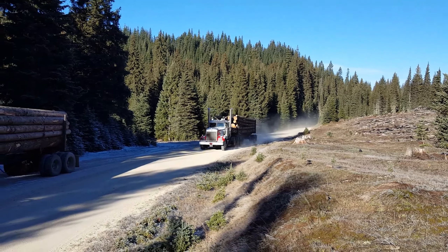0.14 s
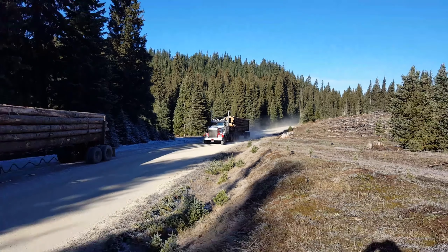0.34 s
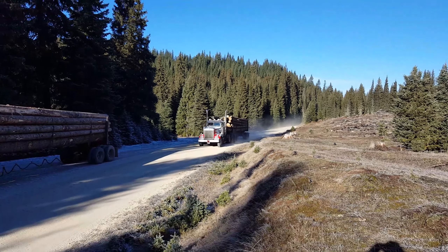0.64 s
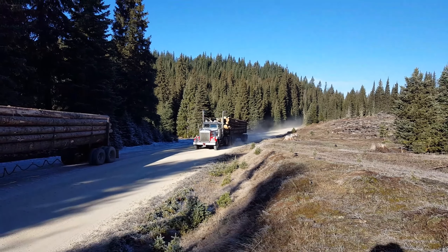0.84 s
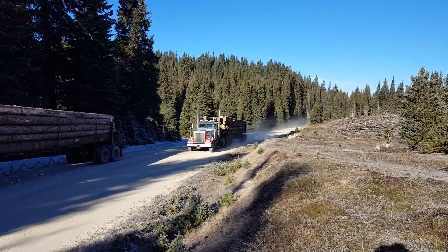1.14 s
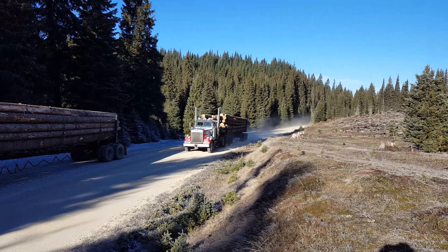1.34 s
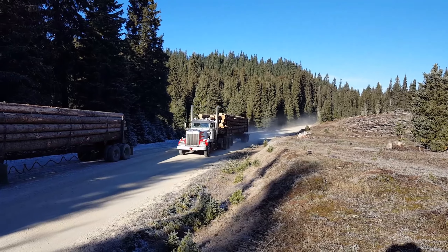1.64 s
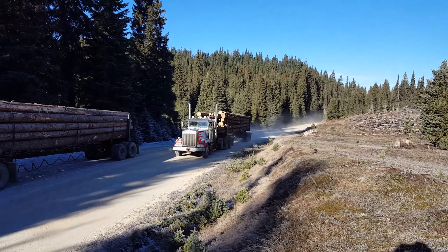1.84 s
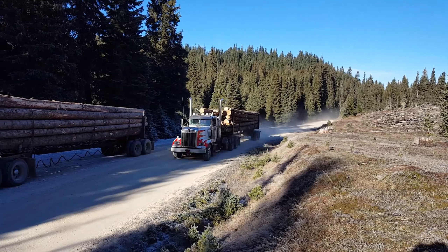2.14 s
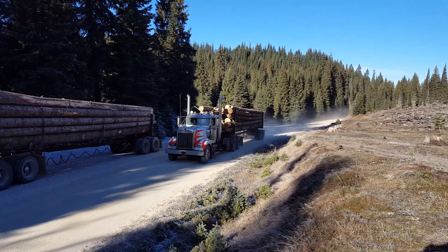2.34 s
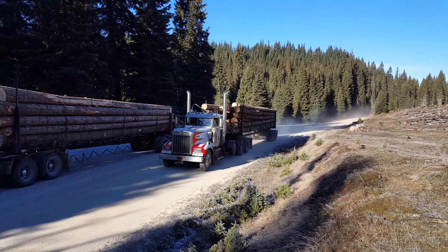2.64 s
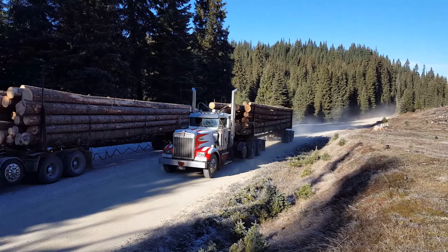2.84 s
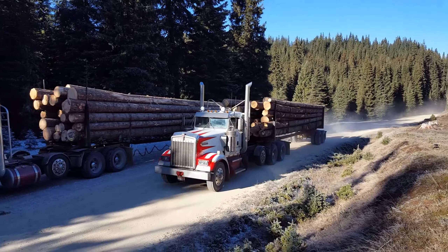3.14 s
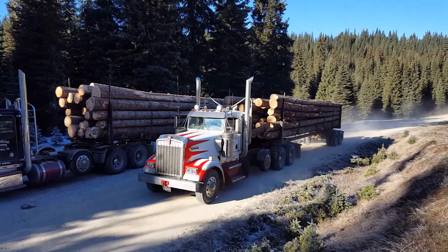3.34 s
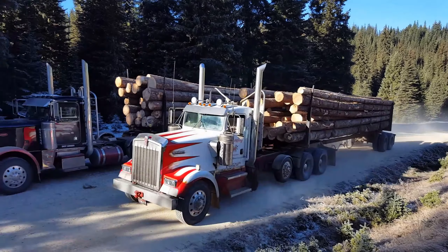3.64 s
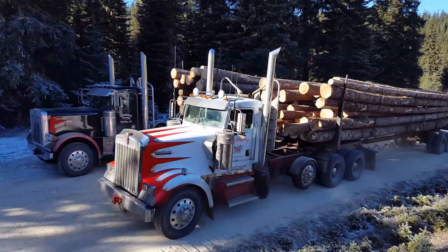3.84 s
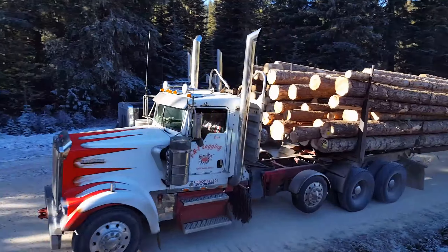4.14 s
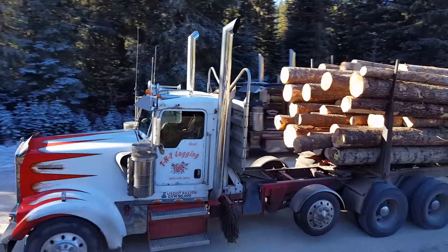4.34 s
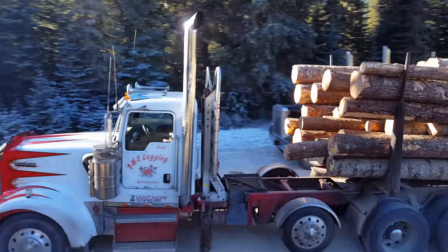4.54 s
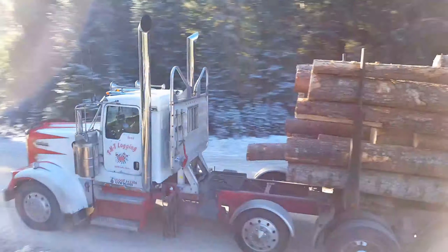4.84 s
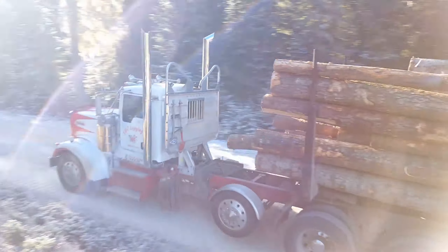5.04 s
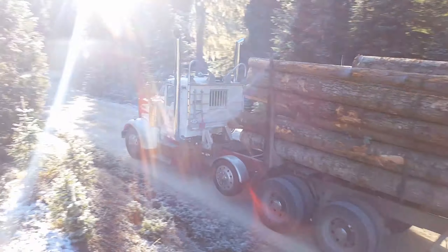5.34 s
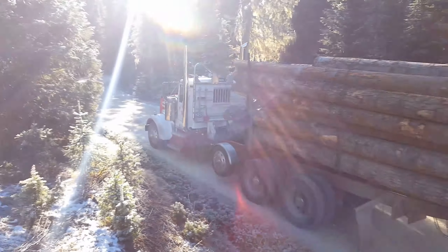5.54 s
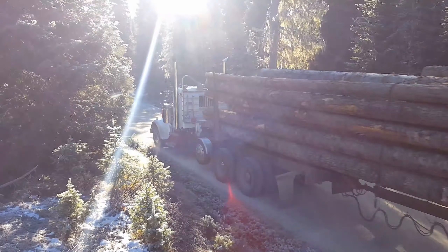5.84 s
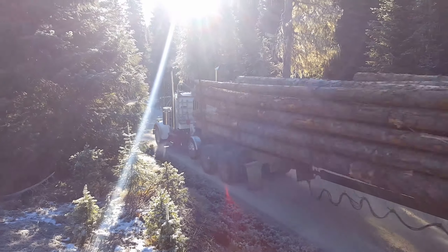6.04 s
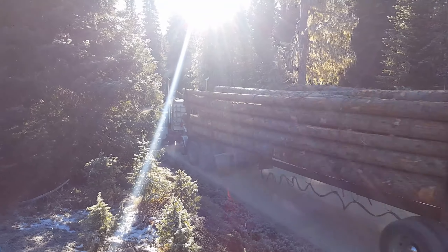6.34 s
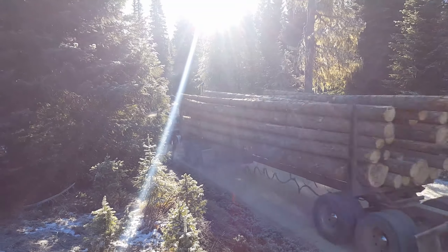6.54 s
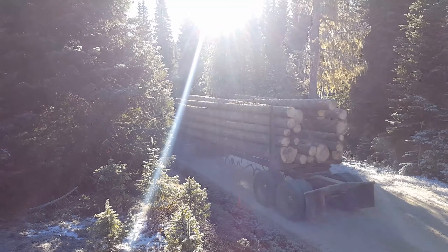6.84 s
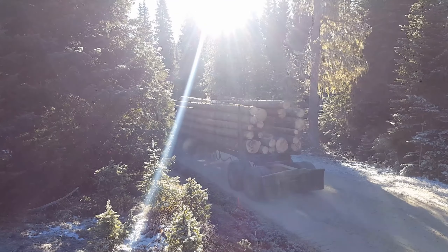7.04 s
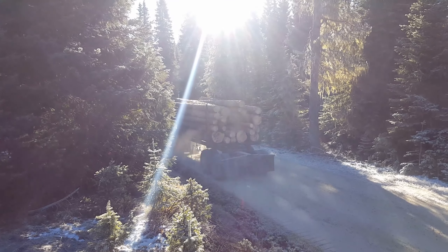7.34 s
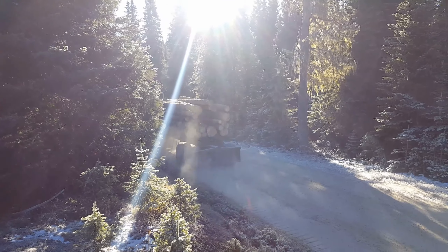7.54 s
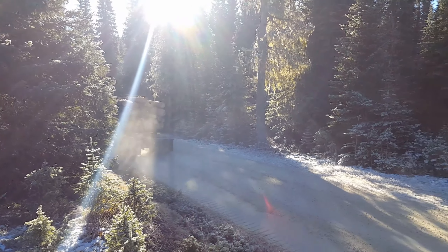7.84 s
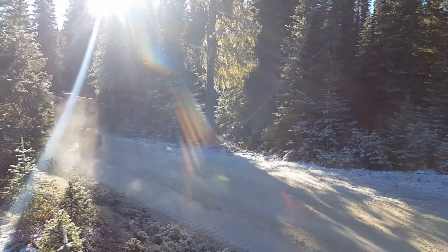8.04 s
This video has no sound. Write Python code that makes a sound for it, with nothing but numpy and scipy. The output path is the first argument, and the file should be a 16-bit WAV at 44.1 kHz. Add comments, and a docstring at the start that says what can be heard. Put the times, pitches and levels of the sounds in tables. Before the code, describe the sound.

A loaded diesel truck drones closer on a gravel forest road, passes with whistle, rattling panels and clanking steel, then fades away.

```python
"""Diesel truck on a gravel forest road

A loaded six-cylinder truck climbs, passes close by and drives off. The exhaust is a harmonic series on
the firing rate, combed by a ground echo; uneven cylinders add lines between. Gated noise makes the block
clatter, wavering sines the turbocharger whistle, random bursts the tyres on gravel; driven resonances make
panels rattle, decaying sines dull knocks, chains and hooks, and swelling harmonics a log bunk's squeak."""
import sys
import numpy as np
from scipy import signal
from scipy.fft import rfft, irfft, next_fast_len
from scipy.io import wavfile
from scipy.ndimage import uniform_filter1d

SR = 44100
rng = np.random.default_rng(int(sys.argv[2]) if len(sys.argv) > 2 else 0)


def output_pcm(signal):
    """Save a mono or channel-first signal as 16-bit PCM at the path in sys.argv[1].

    Samples are clipped to [-1, 1] before scaling.
    """
    pcm = np.clip(np.atleast_2d(signal).T, -1, 1) * 32767
    wavfile.write(sys.argv[1], SR, np.round(pcm).astype(np.int16))


N = 361175


def ground_echo(multiple, hz, delay):
    """Interference: the direct sound and its delayed ground echo add or cancel with their phase difference."""
    return 1 + 0.59 * np.exp(-2j * np.pi * multiple * hz * delay)


def harmonic_levels(first_db, overtone_db, bright_db, echo):
    """Spectral envelope: overtones follow a slope per octave, the ground echo and slow changes of level."""
    # Relative levels of harmonics 2 to 6 in dB.
    relative_db = [1.5, 0, -4.5, -13.5, -25]
    # Levels of the upper exhaust harmonics rise and fall. Each row: time in seconds, seventh harmonic in dB
    # before a fixed cut, then lifts of the fourth, fifth and sixth in dB.
    upper_harmonics = [(0, -53, 1.5, 1, -1), (.5, -51, 0, -2.5, 5), (1, -49, 4, 2, -2),
                       (1.5, -44, 2.5, 0.5, -2), (1.9, -41.5, -1.5, 0.5, 2), (2.3, -41.5, 4, 5, -2),
                       (2.6, -38.5, -2, 3.5, 2), (2.9, -37, -2, 0.5, -1), (3.2, -41.5, -1.5, -3, -5),
                       (3.5, -36.5, 0, 1, -3), (3.8, -33.5, 1.5, 0.5, -10), (4.1, -43, -8, -2.5, -2),
                       (4.4, -47, 1.5, -1.5, 5), (4.7, -49, 1.5, 3, -6), (5, -37.5, -2.5, -2, -3),
                       (5.3, -38, 1.5, 4.5, 9), (5.6, -44, 1, -2.5, 1), (5.9, -54, -4, 3, 3.5),
                       (6.2, -45, 3.5, 1, 4.5), (6.5, -42, 3, -1.5, -4.5), (6.8, -53, -10, 0, 3),
                       (7.1, -49, -13, -3.5, -5), (7.4, -60, 6, -5, -1), (7.8, -59, 0.5, 2, 2),
                       (8.19, -53, -11, -5, 1)]
    levels_db = [first_db]
    for k, db in enumerate(relative_db, 2):
        slope_db = bright_db * np.log2(k / 2)
        levels_db.append(overtone_db + db + slope_db + 20 * np.log10(np.abs(echo(k))))
    seventh_db, *lifts_db = in_time(upper_harmonics)
    lifted_db = [db + lift_db for db, lift_db in zip(levels_db[3:], lifts_db)]
    return levels_db[:3] + lifted_db + [seventh_db - 3.5]


def exhaust(firing, hz, levels_db, echo, waver_db, lean):
    """Fourier synthesis: firing harmonics with turbulent puffs, and phase-locked lines of uneven cylinders."""
    # Trees and load slowly turn each overtone's phase. Each row: time in seconds, rms turn in radians.
    scatter_rows = [(0, .12), (2.4, .2), (3.2, .5), (4.8, .5), (5.2, .15), (6.2, .2), (8.19, .4)]
    # How much the uneven lines stand out. Each row: time in seconds, level in dB.
    unevenness = [(0, -4), (1.6, -4), (2.4, -.5), (3.2, -1), (3.5, -4), (4.3, -4), (4.7, 0), (5.3, -5),
                  (5.7, -10), (6.2, -10), (7, -6), (8.19, -4)]
    # The pulses grow compact as the truck draws near and stay so. Each row: time in seconds, share of the
    # stacks' phase turn.
    through_stacks = [(0, 1), (2.9, 1), (3.4, .4), (4.3, .4), (4.9, 0), (8.19, 0)]
    # The drone breaks up behind load and trees. Each row: time in seconds, level in dB of each quadrature
    # of the turbulent puffs relative to the harmonics.
    puffs = [(0, -31), (4, -30), (6.2, -31), (6.8, -25), (7.3, -14), (8.19, -11.5)]
    # Mean phase in radians of each family of uneven lines, by sixths modulo six.
    pattern_rad = [0, 2.1, 0, 1.5, 0, -2.1]
    # Each row: frequency in sixths of the firing rate, offset in dB from the harmonics around.
    uneven = [(3, -50), (8, -13), (9, -7), (13, -40), (14, -14.5), (15, -9), (16, -59.5), (19, -11.5),
              (20, -8.5), (21, -11.5), (22, -11.5), (23, -19.5), (25, -27), (26, -28), (27, -11.5),
              (28, -11.5), (31, -13), (32, -3), (33, -8.5), (34, -8.5), (38, -12)]
    stack_hz, stack_width_hz = (245, 385), 15
    spread, = in_time(scatter_rows)
    scatter = [0, 0] + [spread * drift(.25) for _ in range(7)]
    stand_db, = in_time(unevenness)
    through, = in_time(through_stacks)
    puff_db, = in_time(puffs)

    def phase(multiple):
        """Linear filtering: each resonance turns the phase above it by half a cycle; the echo turns it too."""
        turn = 0
        for pipe_hz in stack_hz:
            turn = turn + np.arctan((multiple * hz.mean() - pipe_hz) / stack_width_hz) + np.pi / 2
        source = multiple * (firing + lean)
        return source - through * turn + scatter[round(multiple)] + np.angle(echo(multiple))

    out = 0
    for k, level_db in enumerate(levels_db, 1):
        # The fundamental is puffed at a quarter of the amplitude.
        puff = from_db(puff_db) * min(k / 2, 1) ** 2 * (drift(12) + 1j * drift(12))
        out = out + from_db(level_db) * np.imag((1 + puff) * np.exp(1j * phase(k)))
    pattern = [rad + .25 * drift(1) for rad in pattern_rad]
    for sixths, under_db in uneven:
        # The level is interpolated between the neighbouring harmonics.
        place = np.clip(sixths / 6 - 1, 0, 5)
        low = min(int(place), 4)
        around_db = levels_db[low] + (place - low) * (levels_db[low + 1] - levels_db[low])
        line = np.sin(phase(sixths / 6) + pattern[sixths % 6])
        out = out + from_db(around_db + under_db + stand_db + waver_db * drift(1.3)) * line
    return np.sqrt(2) * out


def block_clatter(firing, level_db):
    """Amplitude modulation: combustion gates noise whose spectrum shifts from the front to the side view."""
    # From afar, ahead of the truck. Each row: frequency in hertz, relative density in dB per hertz.
    ahead_spectrum = [(410, -31.5), (700, -6), (774, -2), (877, -1.5), (942, -1.5), (1090, -1), (1170, -1),
                      (1270, -2.5), (1580, -13.5), (2030, 2), (2250, -9.5), (2900, -20.5), (3770, -50.5),
                      (6380, -120)]
    # Alongside it. Each row: frequency in hertz, relative density in dB per hertz.
    beside_spectrum = [(440, -37.5), (750, -8.5), (874, -16), (919, -5), (1130, 1.5), (1230, -2), (1390, 2),
                       (1610, -6), (2250, -4), (2900, -13.5), (3770, -43.5), (6380, -120)]
    # Each row: time in seconds, power share heard from the side.
    alongside = [(0, 0.0074), (2, 0.072), (3.4, 0.5), (4.2, 0.8), (6.8, 0.51), (8.19, 0.35)]
    side, = in_time(alongside)
    knocking = firing_gate(firing, depth=0.35) * from_db(1.0 * drift(17))
    ahead = np.sqrt(1 - side) * coloured(ahead_spectrum, knocking)
    beside = np.sqrt(side) * coloured(beside_spectrum, knocking)
    return from_db(level_db) * (ahead + beside)


def rattle(firing):
    """Forced resonance: each firing thumps the pipe and shakes the panels, one cylinder harder than the rest."""
    # Each row: time in seconds, pipe rasp in dB, panel rattle in dB.
    rattle_rows = [(0, -56.5, -64.5), (3.9, -46.5, -63.5), (4.3, -37, -50), (4.55, -32, -38),
                   (4.7, -34.5, -37.5), (4.9, -38.5, -42), (5.1, -40, -42), (5.55, -40, -61),
                   (5.7, -31.5, -53), (5.95, -35.5, -55), (6.2, -38.5, -61), (6.33, -35, -43),
                   (6.52, -31, -46), (6.62, -44, -45), (6.9, -53, -44), (7.5, -44, -59), (8.19, -48.5, -64)]
    # Pipe resonances. Each row: frequency in hertz, width in hertz, gain in dB.
    pipe_modes = [(610, 110, -3), (730, 130, 0), (830, 90, -5)]
    # Panel resonances. Each row: frequency in hertz, width in hertz, gain in dB.
    panel_modes = [(2940, 130, -15), (3830, 96, -2.5), (4500, 200, 3.5), (5100, 330, -2.5),
                   (5500, 300, -3.5)]
    # Mean force in dB of each cylinder of the cycle.
    cylinders_db = [4.5, -1, 1.5, -1.5, 0, -3.5]
    rasp_db, rattle_db = in_time(rattle_rows)
    turn = firing / (2 * np.pi)
    count = np.floor(turn).astype(int)
    chance_db = 1.9 * rng.standard_normal(np.ptp(count) + 1)
    force_db = np.array(cylinders_db)[count % 6] + chance_db[count]
    # Each burst decays by 13 dB until the next firing.
    noise = rng.standard_normal((4, N)) * from_db(force_db - 13 * (turn - count))
    thumps = np.diff(count, prepend=count[0]) * from_db(.5 * force_db)
    rasp = from_db(rasp_db) * resonances(thumps + 0.1 * noise[3], pipe_modes)
    shared_and_own = noise[0] + 0.48 * noise[1:3]
    return rasp + from_db(rattle_db) * resonances(shared_and_own, panel_modes)


def turbo(firing):
    """Frequency modulation: a thin wavering whistle with a smear 2.5 % lower, and firing-gated intake hiss."""
    # Each row: time in seconds, whistle in hertz before smoothing, whistle in dB before its spin-down fade,
    # intake hiss in dB, left-right difference of the whistle in dB.
    turbo_rows = [(0, 6300, -67, -53, -11), (.45, 6250, -57.5, -53.5, -4), (1, 6006, -64.5, -51, -10),
                  (1.5, 6220, -60, -48.5, -14), (1.9, 6520, -47.5, -44.5, -7),
                  (2.8, 7110, -47, -28.5, -6.5), (3.3, 7410, -41, -24, 2), (3.7, 7720, -42, -32, 6.5),
                  (4.4, 8060, -49, -33, 7.5), (5.2, 8240, -55, -35.5, 5.5), (6, 8150, -62, -36.5, 8),
                  (6.4, 8060, -60, -33, 11.5), (6.9, 7520, -47.5, -42, 2), (7.2, 7014, -51, -37, -1),
                  (7.4, 6675, -67, -38, -18.5), (7.5, 6440, -62, -37, -17), (7.57, 6300, -51.5, -37, -15),
                  (7.68, 6090, -56, -38, -15), (7.8, 5910, -66, -41, -19), (8.19, 5517, -73, -48, -18)]
    # Each row: time in seconds, smear over the whistle in dB, share of hiss not dulled by air.
    turbo_air = [(0, 3, 0.0098), (2, -1, 0.05), (3.4, 2.5, 0.53), (4.2, 4.5, 0.73), (7.1, 0, 0.78),
                 (7.45, -12, 0.54), (8.19, -14, 0.66)]
    # Intake hiss. Each row: frequency in hertz, relative density in dB per hertz.
    intake = [(3240, -34), (5500, -18.5), (6060, 1.5), (6840, 5.5), (7240, 2.5), (8420, -16), (10900, -58),
              (18500, -120)]
    hz, whistle_db, hiss_db, side_db = in_time(turbo_rows)
    smear_db, clear = in_time(turbo_air)
    # The whistle dies as the rotor spins down.
    whistle_db = whistle_db - np.clip((5980 - hz) / 8, 0, 40)
    phase = 2 * np.pi * np.cumsum(inertia(hz) * (1 + 0.001 * drift(25))) / SR
    gain = np.sqrt(2) * from_db(whistle_db + 4.1 * drift(41))
    whistle = gain * np.array([np.sin(phase), np.sin(phase + 0.23 + 0.39 * drift(1.3))])
    below = np.exp(1j * phase * .975)
    smear = np.array([np.imag(below * (drift(150) + 1j * drift(150))) for _ in "LR"])
    smear = smear * from_db(whistle_db + smear_db)
    breath = firing_gate(firing, depth=2.2) * from_db(1.4 * drift(21))
    hiss = from_db(hiss_db) * coloured(intake, breath)
    # Air dulls the far hiss.
    dull = signal.sosfilt(signal.butter(4, 7000, fs=SR, output="sos"), hiss)
    hiss = clear * hiss + (1 - clear) * dull
    return pan(whistle + smear, side_db) + pan(hiss, 0.29 * side_db)


def tyre_hiss(firing, tyre_db):
    """Superposed impacts: gravel bursts and the firing modulate coloured noise."""
    # Each row: frequency in hertz, relative density in dB per hertz.
    hiss_spectrum = [(1410, -40), (2400, 2.5), (2790, -9), (3070, 3), (3300, -1.5), (3620, 2.5), (4110, -5),
                     (4480, -8.5), (5090, -7), (6000, -7), (7800, -46), (13200, -120)]
    return from_db(tyre_db) * coloured(hiss_spectrum, gravel(150, 1.8) * firing_gate(firing, depth=2.5))


def roar(tyre_db):
    """Superposed impacts: low noise under a gravel envelope follows the swing of the tyre noise."""
    # Each row: frequency in hertz, relative density in dB per hertz.
    roar_spectrum = [(250, 2), (400, 6), (520, -3.5), (700, -3.5), (850, -3.5), (1200, -29)]
    level_db = -42 + tyre_db - tyre_db.mean()
    return from_db(level_db) * coloured(roar_spectrum, gravel(80, 4.5), band=(480, 780))


def rumble(rumble_db, delay):
    """Comb filtering: low road noise is joined by its bounce off the road."""
    # Each row: frequency in hertz, relative density in dB per hertz.
    rumble_spectrum = [(15, -32), (25, -10), (40, -9), (55, -2.5), (90, -3), (140, 4), (220, 5), (310, -1),
                       (420, -14), (600, -57)]
    return from_db(rumble_db) * with_echo(coloured(rumble_spectrum, 1, band=(20, 55)), delay, .7)


def grit():
    """Impulse excitation: single stones snap sharply, each stronger on its own side."""
    # Each row: time in seconds, level in dB.
    grit_rows = [(0, -66), (3.8, -54), (4.4, -46), (4.7, -43), (5.1, -47), (5.8, -49), (6.2, -46),
                 (7.1, -46), (7.5, -55), (8.19, -64)]
    snaps_per_s = 190  # both sides together
    struck = rng.random((2, N)) < snaps_per_s / 2 / SR
    strength = from_db(5.4 * np.minimum(rng.exponential(1, (2, N)), 4))
    snaps = struck * strength * rng.choice([-1, 1], (2, N))
    snaps = snaps + .6 * snaps[::-1]
    band = signal.butter(2, [1000, 3900], "band", fs=SR, output="sos")
    return from_db(in_time(grit_rows)[0]) * rms_one(signal.sosfilt(band, snaps + 1e-18))


def squeak():
    """Stick-slip of steel on steel: a log bunk's harmonic cries swell, waver, sag in pitch and fade."""
    # Each row: start in seconds, length in seconds, starting pitch in hertz, sag in hertz per second,
    # levels of harmonics 1 to 4 in dB before swell and flicker.
    squeaks = [(5.053, .085, 880, 240, -33, -30, -38, -45), (5.122, .086, 888, 450, -25, -32, -38, -46),
               (5.203, .088, 776, 100, -27.5, -40, -34, -54)]
    out = np.zeros(N)
    waver_hz = 5 * drift(18)
    waver = np.cumsum(waver_hz) / SR
    flicker = [from_db((1.8 + .6 * k) * drift(40)) for k in range(4)]
    for start, length, hz, sag, *levels_db in squeaks:
        age = np.arange(round(length * SR)) / SR
        first = round(start * SR)
        span = slice(first, first + len(age))
        phase = 2 * np.pi * (hz * age - sag * age ** 2 / 2 + waver[span])
        swell = np.abs(np.sin(np.pi * (age / length) ** 1.3))
        cry = 0
        for k, level_db in enumerate(levels_db, 1):
            # Higher harmonics build up later and fade sooner.
            gain = from_db(level_db) * flicker[k - 1][span] * swell ** (.35 * k)
            cry = cry + gain * np.sin(k * phase)
        out[span] += np.sqrt(2) * cry
    return out


def chains():
    """Free vibration: struck chain links ring briefly."""
    # Each row: start in seconds, initial level in dB before the rise, ring in hertz, 60 dB decay in seconds.
    clinks = [(5.279, -32, 6970, .04), (5.552, -24.5, 6310, 0.093), (5.61, -28, 6970, 0.072)]
    return sum(ring(s, db, hz, t60, rise=0.00051) for s, db, hz, t60 in clinks)


def hooks():
    """Modal superposition: loose stakes and hooks tick on two close modes with a dry crack."""
    # Each row: start in seconds, initial level of the main mode in dB before the rise, its ring in hertz.
    ticks = [(4.4468, -34, 3650), (4.4638, -35, 3550), (4.5536, -32, 3870), (4.578, -31, 3690),
             (4.645, -18, 3860), (4.6748, -19, 4500), (4.7038, -33, 4640), (4.7362, -24, 3720),
             (4.7641, -28, 4460), (4.796, -18, 4370), (4.827, -30, 4380), (4.844, -23, 4500),
             (4.8583, -19, 4330), (4.875, -23, 4780), (4.9497, -36, 4450), (4.9816, -22, 3730),
             (5.0123, -31, 3800), (5.0907, -26, 3400), (5.1378, -23, 3400), (5.3882, -37, 3600),
             (5.681, -28, 3770), (5.7574, -29, 3560), (5.8636, -24, 3722), (6.1824, -33, 3622),
             (6.3035, -23, 3750), (6.3306, -42, 3470), (6.3491, -26, 3700), (6.4054, -24, 3680),
             (6.4513, -22, 3607), (6.498, -23, 3577), (6.5567, -31, 3560), (6.8229, -33, 3554),
             (6.8404, -29, 3640), (6.9131, -32, 3700), (6.9282, -23, 3494), (6.9601, -25, 3700),
             (7, -32, 3400), (7.0459, -24, 3370), (7.092, -31, 3400), (7.165, -31, 3500),
             (7.314, -37, 3600)]
    t60_s, crack_db = .022, -9
    out = 0
    for s, db, hz in ticks:
        out = out + ring(s, db, hz, t60_s, rise=0.00061)
        out = out + ring(s, db - 10.5, hz * 1.13, t60_s, rise=0.0004)
        out = out + ring(s, db + crack_db, hz * .6, .005, rise=.0001)
        out = out + ring(s, db + crack_db, hz * .8, .004, rise=.0001)
    return out


def dull_knocks():
    """Modal superposition: dull, quickly damped knocks of four modes, the early ones once per engine cycle."""
    # Each row: start in seconds, reference level in dB, reference ring in hertz.
    knocks = [(4.461, -25, 748), (4.553, -21.5, 790), (4.645, -13.5, 598), (4.732, -19, 672),
              (4.824, -19.5, 673), (6.9705, -13.5, 880), (7.16, -20.5, 850), (7.241, -28, 846),
              (7.29, -22, 800)]
    modes = ((.62, -3), (.8, -6), (1, -1), (1.3, -6))  # frequency ratio, relative dB
    out = 0
    for s, db, hz in knocks:
        for ratio, under_db in modes:
            out = out + ring(s, db + under_db, hz * ratio, .028)
    return out


def cracks():
    """Exponential decay: short broadband noise cracks, most of them with the dull knocks."""
    # Each row: start in seconds, initial noise envelope in dB before the band filter and its gain,
    # 60 dB decay in seconds.
    crack_rows = [(4.46, -32, .012), (4.552, -31, .015), (4.642, -25, .035), (4.657, -28, .015),
                  (4.733, -29, .025), (4.826, -29, .025), (4.875, -32, .01), (4.967, -31, .012),
                  (5.012, -32, .012), (7.163, -33, .015), (7.235, -28, .006), (7.243, -31, .008),
                  (7.294, -32, .02)]
    envelope, t = np.zeros(N), np.arange(SR // 10) / SR
    for s, db, t60 in crack_rows:
        first = round(s * SR)
        envelope[first:first + len(t)] += from_db(db - 60 * t / t60)
    band = signal.butter(2, [500, 4800], "band", fs=SR, output="sos")
    return 2 * signal.sosfilt(band, envelope * rng.standard_normal(N) + 1e-18)


def trailer():
    """Random excitation: uneven small blows ring the trailer's stakes and chains."""
    # Each row: time in seconds, level in dB.
    trailer_rows = [(0, -79), (5.5, -53), (5.8, -44), (6, -52), (6.2, -57), (6.3, -44), (6.5, -44),
                    (6.6, -52), (6.8, -53), (6.95, -50), (7.1, -52), (7.3, -57), (8.19, -82)]
    # Each row: resonance in hertz, width in hertz, gain in dB.
    gear_modes = [(2880, 200, -4.5), (3620, 200, 0)]
    blows_per_s = 320
    struck = rng.random(N) < blows_per_s / SR
    strength = from_db(6.3 * np.minimum(rng.exponential(1, N), 4))
    blows = struck * strength * rng.choice([-1, 1], N)
    return from_db(in_time(trailer_rows)[0]) * resonances(blows, gear_modes)


def firing_gate(firing, depth):
    """Amplitude modulation: each combustion throws a burst of noise, swinging by plus or minus depth dB."""
    return from_db(depth * np.cos(firing))


def gravel(per_s, spread_db):
    """Shot noise: stones crack at random, each leaving a short decay in the envelope."""
    strength = from_db(spread_db * np.minimum(rng.exponential(1, N), 4))
    bursts = (rng.random(N) < per_s / SR) * strength
    return 1 + signal.lfilter([1], [1, -.992], bursts) * 0.26


def inertia(hz):
    """Rotational inertia: speed changes smoothly, here by a quarter-second moving average."""
    return uniform_filter1d(hz, SR // 4, mode="nearest")


def with_echo(x, delay, strength):
    """Reflection: direct sound plus its delayed bounce off the road."""
    at = np.arange(N)
    return x + strength * np.array([np.interp(at - delay * SR, at, side) for side in x])


def resonances(x, modes):
    """Modal response: parallel two-pole resonators of alternating sign, scaled to rms 1."""
    out = 0
    for k, (hz, width, db) in enumerate(modes):
        r = np.exp(-np.pi * width / SR)
        b = (1 - r * r) / 2 * np.array([1, 0, -1])
        a = [1, -2 * r * np.cos(2 * np.pi * hz / SR), r * r]
        out = out + (-1) ** k * from_db(db) * signal.lfilter(b, a, x)
    return rms_one(out)


def ring(at, level_db, hz, t60, rise=0.00088):
    """Damped oscillation: one sine struck at time at, with a short rise and exponential decay."""
    out, start = np.zeros(N), round(at * SR)
    t = np.arange(min(int(t60 * SR), N - start)) / SR
    envelope = from_db(level_db - 60 * t / t60) * (1 - np.exp(-t / rise))
    out[start:start + len(t)] = envelope * np.sin(2 * np.pi * hz * t)
    return out


def coloured(spectrum, envelope, band=None):
    """Partial coherence: shaped stereo noise from mid and side parts, scaled by its power within band."""
    # Each row: frequency in hertz, left-right likeness from 0 to 1.
    likeness = [(60, 0.63), (250, 1), (500, 0.82), (1000, 0.9), (2000, 0.63), (4000, 0.17), (8000, 0.065)]
    size = next_fast_len(N)
    hz = np.fft.rfftfreq(size, 1 / SR)
    mid, side = rfft(rng.standard_normal((2, N)) * envelope, size) * from_db(at_hz(spectrum, hz))
    alike = at_hz(likeness, hz)
    mid, side = np.sqrt(1 + alike) * mid, np.sqrt(1 - alike) * side
    inside = mid if band is None else mid * (hz > band[0]) * (hz < band[1])
    # The mid power in the band is scaled up to mid and side together.
    mid_power = np.mean(np.abs(mid) ** 2)
    both_power = np.mean(np.abs(mid) ** 2 + np.abs(side) ** 2)
    power = np.var(irfft(inside, size)[:N]) * both_power / mid_power
    return irfft(np.array([mid + side, mid - side]), size)[:, :N] / np.sqrt(power)


def drift(rate):
    """Low-pass random process: slow chance of rms 1, with its corner near rate in hertz."""
    # Computed at every 40th sample, then interpolated.
    r = np.exp(-80 * np.pi * rate / SR)
    slow = signal.lfilter([1], [1, -2 * r, r * r], rng.standard_normal(N // 40 + 2002))[2000:]
    return np.interp(np.arange(N) / 40, np.arange(len(slow)), rms_one(slow))


def pan(x, db):
    """Interaural level difference: left over right by db."""
    return x * from_db(np.outer([.5, -.5], db))


def from_db(db):
    """Logarithmic level: decibels to amplitude ratio."""
    return 10 ** (np.asarray(db) / 20)


def rms_one(x):
    """Effective value: scale to rms 1."""
    return x / np.sqrt(np.mean(x ** 2) + 1e-20)


def in_time(rows):
    """Linear interpolation: each column after the first becomes a curve over the samples."""
    s, *columns = np.transpose(rows)
    return [np.interp(np.arange(N) / SR, s, c) for c in columns]


def at_hz(points, hz):
    """Logarithmic frequency scale: interpolate the points along it."""
    return np.interp(np.log(hz + 1), np.log(np.array(points)[:, 0]), np.array(points)[:, 1])


def scene():
    """Linear superposition: one firing phase and echo delay drive the engine and road, and all is summed."""
    # Each row: time in seconds, firing rate in hertz before smoothing, fundamental in dB, overtones in dB,
    # their brightness in dB per octave, lag of the ground echo in milliseconds.
    exhaust_rows = [(0, 69.52, -17.5, -23, -3, 1.65), (.35, 69.4, -15.5, -18.5, -6.5, 2.26),
                    (.7, 69.5, -15.5, -17.5, -6.5, 2.45), (1, 69.5, -14.5, -19, -8, 2.46),
                    (1.3, 68.4, -14, -18, -8, 2.46), (1.7, 68.9, -13.5, -17.5, -11, 3),
                    (2.05, 68.76, -12.5, -14, -15, 3.39), (2.45, 68.67, -12, -22, -5, 3.1),
                    (2.8, 69.07, -14, -13.5, -8.5, 3.4), (2.95, 68.6, -14.5, -18.5, -4, 4.1),
                    (3.1, 67.28, -12.5, -22.5, 4.5, 3.53), (3.3, 67.23, -14, -22.5, 4, 3.3),
                    (3.55, 67.23, -14.5, -15.5, 0, 3.03), (3.9, 66.97, -14.5, -11, -9.5, 4.1),
                    (4.2, 67.14, -23.5, -16.5, 4, 5.4), (4.54, 66.15, -38.5, -16, -4, 6.07),
                    (4.75, 65.43, -26.5, -17.5, -3.5, 6.51), (4.98, 64.6, -34.5, -17.5, 3.5, 6.21),
                    (5.14, 64.23, -30.5, -18, 1, 5.4), (5.3, 64.85, -27, -18.5, -0.5, 4.4),
                    (5.45, 65.1, -25.5, -18, 0.5, 3.8), (5.6, 64.7, -22, -17, 2.5, 3.34),
                    (5.78, 65.76, -17, -26, 9.5, 2.94), (5.95, 65.54, -19, -37, 17.5, 3.02),
                    (6.25, 66.24, -16, -23, 6.5, 1.96), (6.4, 65.55, -16, -25.5, 11.5, 2.03),
                    (6.55, 67.87, -20, -15.5, 2, 1.95), (6.7, 66.96, -17, -20.5, 1.5, 2.03),
                    (6.85, 66.8, -17, -28, 9, 1.03), (7.05, 67.6, -18.5, -28.5, 5, 1.093),
                    (7.22, 68.03, -19, -28, -1, 1.63), (7.33, 68, -28, -34, 0.5, 2.06),
                    (7.45, 67.9, -19, -27, -5, 2.22), (8.19, 67, -24.5, -53.5, 19.5, 1.64)]
    # Each row: time in seconds, road rumble in dB, tyre noise in dB, block clatter in dB.
    rolling = [(0, -43.5, -50, -34.5), (.8, -57, -48.5, -33.5), (1.46, -45.5, -45.5, -32),
               (2.14, -42.5, -42.5, -29), (3.31, -42, -36, -24.5), (3.9, -39, -35.5, -25.5),
               (4.31, -59.5, -37.5, -31), (4.65, -45.5, -37, -28.5), (5.3, -45, -39.5, -32),
               (5.86, -41.5, -39, -31), (6.41, -45, -36, -34.5), (6.65, -42, -42, -32),
               (6.91, -45, -38, -33), (7.3, -44.5, -45.5, -35.5), (7.87, -47.5, -52, -40.5),
               (8.19, -49.5, -50.5, -44.5)]
    hz, first_db, overtone_db, bright_db, lag_ms = in_time(exhaust_rows)
    rumble_db, tyre_db, clatter_db = in_time(rolling)
    hz, delay = inertia(hz), lag_ms / 1000
    firing = 2 * np.pi * np.cumsum(hz) / SR
    # The cycle is counted from one blow of the hardest cylinder, at 4.642 s.
    firing = firing - firing[round(4.642 * SR)]

    def echo(multiple):
        """Interference at a multiple of the firing rate."""
        return ground_echo(multiple, hz, delay)

    levels_db = harmonic_levels(first_db, overtone_db, bright_db, echo)
    drone = exhaust(firing, hz, levels_db, echo, waver_db=1.6, lean=0.28)
    engine = drone + block_clatter(firing, clatter_db) + rattle(firing) + turbo(firing)
    road = tyre_hiss(firing, tyre_db) + roar(tyre_db) + rumble(rumble_db, delay) + grit()
    loose_steel = squeak() + chains() + hooks() + trailer()
    return engine + road + loose_steel + dull_knocks() + cracks()


def record(dry):
    """Transduction: two ports differ in colour and phase; soft saturation rounds peaks, a low-pass cuts the top."""
    # Each row: frequency in hertz, left-right difference in dB.
    balance_db = [(60, .4), (250, 1.2), (900, -1.8), (2000, 1.5), (4000, 2), (6000, 0)]
    # Each row: frequency in hertz, lead of the left port in radians.
    left_lead = [(100, 0), (500, .08), (1400, .3), (2000, .8), (3000, .9), (5000, .9), (8000, .9)]
    cutoff_hz = 8570
    size = next_fast_len(N)
    hz = np.fft.rfftfreq(size, 1 / SR)
    lead = np.exp(1j * np.outer([.5, -.5], at_hz(left_lead, hz)))
    ports = irfft(lead * pan(rfft(dry, size), at_hz(balance_db, hz)), size)[:, :N]
    rounded = ports / (1 + np.abs(ports / .97) ** 8) ** .125
    return signal.sosfilt(signal.ellip(9, .5, 65, cutoff_hz, fs=SR, output="sos"), rounded)


dry = scene()
out = record(dry)
output_pcm(out)
```